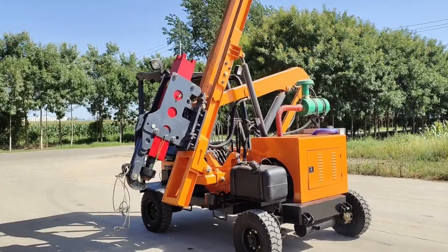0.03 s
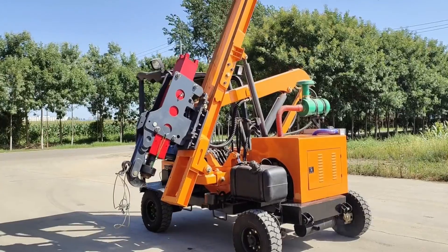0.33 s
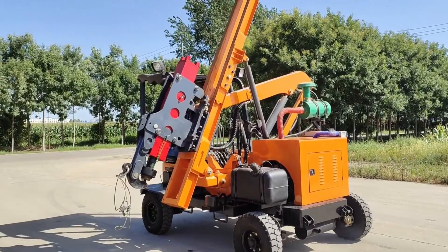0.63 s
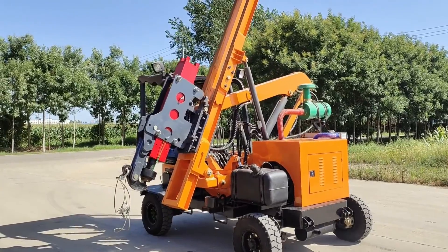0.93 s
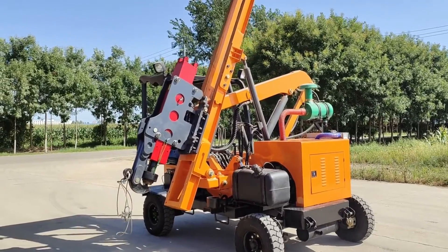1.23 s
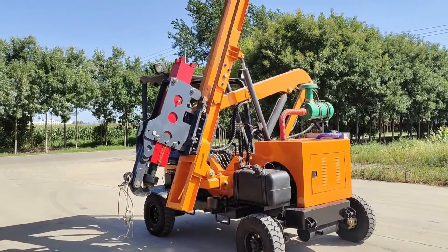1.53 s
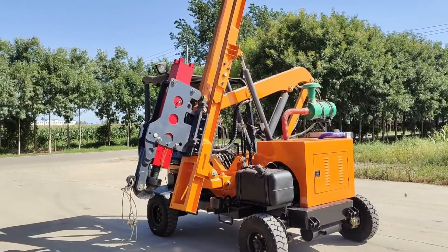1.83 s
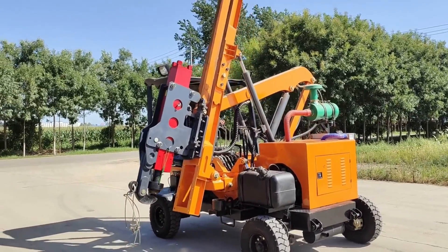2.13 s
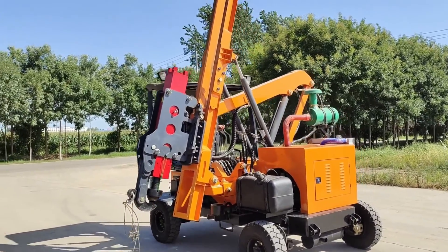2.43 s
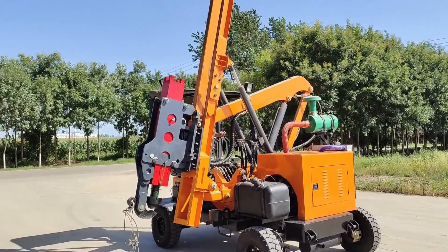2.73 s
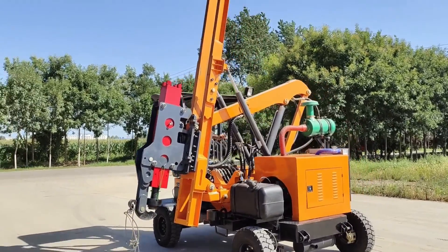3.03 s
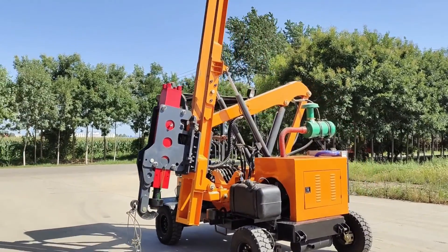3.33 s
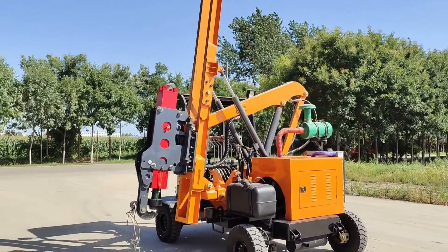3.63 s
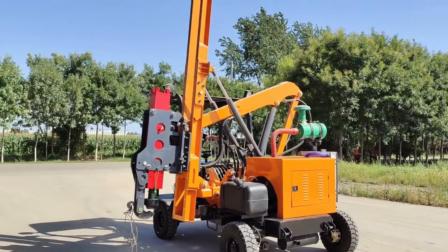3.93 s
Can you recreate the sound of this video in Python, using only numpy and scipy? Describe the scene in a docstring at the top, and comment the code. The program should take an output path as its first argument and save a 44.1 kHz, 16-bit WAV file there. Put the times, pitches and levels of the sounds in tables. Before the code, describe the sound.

A diesel engine idles on a wheeled pile driver in an open yard, knocking and rattling steadily. Loose steel scrapes a few times, then lands with one sharp clank. Low wind gusts and dull bumps hit the microphone.

```python
"""A four-cylinder diesel idles on a wheeled pile driver in an open yard.
Each firing thumps the exhaust and rattles the casing; two cylinders knock the block hard.
Loose steel scrapes a few times, then slides and lands with one sharp, ringing clank.
Fan and gears whirr underneath with a faint whine; low gusts and bumps hit the microphone."""
import sys
import numpy as np
from scipy import signal
from scipy.fft import rfft, irfft
from scipy.io import wavfile
from scipy.ndimage import uniform_filter1d

SR = 44100
rng = np.random.default_rng(int(sys.argv[2]) if len(sys.argv) > 2 else 0)


def to_wav(sig):
    """Store sig (one row per channel, or 1-D mono) as 16-bit WAV at the path in sys.argv[1].

    Samples outside -1..1 are clipped; the rate is SR.
    """
    pcm = np.clip(np.atleast_2d(sig), -1, 1) * 32767
    pcm = np.round(pcm).astype(np.int16)
    wavfile.write(sys.argv[1], SR, pcm.T)  # frames by channels


N = 176400
T = np.arange(N) / SR
FREQ = np.maximum(np.arange(N // 2 + 1) * SR / N, 1)
LEFT_ONLY = np.array([[1], [0]])
FIRING_HZ, FIRST_FIRING_S, CLATTER_SCATTER_DB = 39.49, -.003, 1.3
FIRING_INDEX = np.arange(int(N / SR * FIRING_HZ) + 1)

# Cylinder accents in firing order: block_db, clatter_db, exhaust_db
CYLINDERS = [(-2, -.5, 0), (-4, .5, -4), (0, .5, 1), (-4, -.5, -1.5)]
# Engine pan by band: freq_hz, left_minus_right_db
ENGINE_PAN = [(60, 1.5), (200, -2), (700, 0), (1290, 2), (2380, 3), (4000, -2), (5300, 4), (6300, -5),
              (7600, -5), (8500, -1), (15000, -0.5)]
def engine():
    """The diesel: thump, knock and clatter on the firing beat, over a bed of whirr and murmur."""
    block_db, clatter_db, exhaust_db = np.array(CYLINDERS, float).T
    thump = exhaust(exhaust_db)
    knock = block_shudder(block_db) + hard_knocks() + injector_ticks() + panel_knocks()
    rattle = bursts(firings(clatter_db, CLATTER_SCATTER_DB, lead_s=.0048), decay_s=.004)
    mix = thump + knock + casing_clatter(rattle) + whirr(rattle) + frame_murmur()
    return irfft(rfft(mix) * pan(across(ENGINE_PAN)))

def firings(accents_db, scatter_db, lead_s):
    """One impulse a firing, accented by cylinder, a little loose in time and level."""
    jitter, scatter = rng.standard_normal((len(FIRING_INDEX), 2)).T
    at = ((FIRST_FIRING_S - lead_s + FIRING_INDEX / FIRING_HZ + .0006 * jitter) * SR).astype(int)
    inside = (at >= 0) & (at < N)
    gains = undb(accents_db[FIRING_INDEX % len(accents_db)] + scatter_db * scatter)
    pulses = np.zeros(N)
    pulses[at[inside]] = gains[inside]
    return pulses

# Bass-heavy pipe tone: freq_hz, gain_db
PIPE_EQ = [(20, -47), (40, -2), (80, 3), (120, -2), (200, -20), (400, -36), (900, -55.5)]
# Exhaust fader: time_s, level_db
EXHAUST_LEVEL = [(0, -60), (.7, -37), (1.25, -32), (1.38, -42.5), (1.55, -32.5), (1.8, -32.5), (2.08, -36),
                 (2.15, -36), (2.35, -40), (2.6, -34), (2.85, -39), (3.1, -37), (3.6, -42), (4, -38)]
def exhaust(accents_db):
    """Each firing sends a pulse down the pipe, which rounds it into a thump."""
    pulses = firings(accents_db, scatter_db=1.5, lead_s=.00805)
    return unit(colour(pulses, PIPE_EQ)) * curve(EXHAUST_LEVEL)

# Block resonances: pitch_hz, width_hz, gain_db
BLOCK_RESONANCES = [(527, 160, -12.5), (577, 30, -6.5), (671, 35, -2.5), (734, 20, -9), (834, 17, -3.5)]
# Shudder fader: time_s, level_db
SHUDDER_LEVEL = [(0, -39), (1, -41.5), (2.5, -42.5), (3, -46), (4, -46)]
def block_shudder(accents_db):
    """The block hums with noise that surges at every firing."""
    surges = bursts(firings(accents_db, scatter_db=1.2, lead_s=.004), decay_s=.0056)
    ringing = resonate(noise() * (surges + .7), BLOCK_RESONANCES)
    return unit(resonate(ringing, [(715, 620, 0)])) * curve(SHUDDER_LEVEL)

# Block modes under a hard blow: pitch_hz, gain_db
KNOCK_MODES = [(592, -7), (686, 1), (750, -11), (836, -10)]
# Knock faders: time_s, first_cylinder_db, third_cylinder_db
KNOCK_LEVEL = [(0, -31, -34), (.6, -35, -30), (1.1, -32, -28), (1.8, -31, -29), (2.3, -30, -27.5),
               (2.7, -28.5, -30), (2.95, -33, -31), (3.2, -40, -30), (3.5, -43, -26), (4, -43, -26.5)]
def hard_knocks():
    """Two cylinders take turns, one blow each per engine cycle; the first eases off near the end."""
    fader_s, *faders_db = np.array(KNOCK_LEVEL).T
    out = 0
    for start_s, fader_db in zip((-.009, .0472), faders_db):
        times = np.arange(start_s, N / SR, len(CYLINDERS) / FIRING_HZ)
        levels_db = np.interp(times, fader_s, fader_db) + .7 * rng.standard_normal(len(times))
        out = out + struck(times, levels_db, KNOCK_MODES, swell_s=.006)
    return out

# Tone of casing and valve gear: freq_hz, gain_db
CASING_EQ = [(400, -19), (700, -26), (930, -14), (1070, -2), (1160, -0.5), (1400, 6), (1530, 0),
             (1880, 10.5), (2150, -0.5), (2550, 6.5), (2800, -2.5), (3100, 1), (3850, -14.5), (4620, -4.5),
             (5600, -14.5), (6400, -8.5), (7600, -12), (8300, -23), (9500, -14.5), (11000, -31),
             (15000, -26)]
# Fader for clatter and injector ticks: time_s, level_db
CLATTER_LEVEL = [(0, -39), (1, -37.5), (1.45, -41.5), (1.9, -38), (2.3, -34.5), (2.75, -35), (2.95, -41),
                 (3.4, -42.5), (4, -40.5)]
def casing_clatter(rattle):
    """Casing and valve gear give a bright burst of noise at each firing."""
    return unit(colour(noise() * rattle, CASING_EQ)) * curve(CLATTER_LEVEL)

def injector_ticks(swell_s=.0033, trim_db=-5):
    """The injectors ring the casing panel at every firing, riding the clatter's fader."""
    times = FIRST_FIRING_S + FIRING_INDEX / FIRING_HZ - swell_s
    levels_db = np.interp(times, *np.array(CLATTER_LEVEL).T) + trim_db
    levels_db += CLATTER_SCATTER_DB * rng.standard_normal(len(times))
    return struck(times, levels_db, PANEL_MODES, swell_s)

# Panel modes, shared with the ticks: pitch_hz, gain_db
PANEL_MODES = [(1400, -12), (1730, -1.5), (1860, -1.5), (2320, -6), (2550, -4.5), (3100, -5), (3540, -11),
               (4620, -10), (7450, -15)]
# Panel hits: start_s, level_db
PANEL_HITS = [(.554, -29.5), (.653, -29.5), (1.128, -31), (1.254, -31), (1.54, -27), (2.120, -31),
              (2.779, -31), (3.286, -31.5), (3.592, -30.5), (3.769, -28.5)]
def panel_knocks():
    """Now and then the engine makes a loose panel knock."""
    times, levels_db = np.array(PANEL_HITS).T
    return struck(times, levels_db, PANEL_MODES, swell_s=.0035)

# Modes of the landing steel: pitch_hz, gain_db, t60_s
CLANK_MODES = [(248, -19, 0.058), (298, -17.5, 0.064), (474, -23.5, 0.2), (768, -2, 0.064),
               (755, -23, 0.16), (1130, -21, 0.02), (1435, -23, 0.071), (2580, -19, 0.071),
               (2940, -15, 0.046), (3560, -20, 0.043), (4830, -24, 0.11), (5300, -33, 0.056),
               (6160, -28, 0.07)]
def clank(start_s=.8525, contact_s=.0062, trim_db=-2.5):
    """The steel lands: its ring builds during contact, then dies fast, one mid mode on top."""
    age = np.maximum(T - start_s, 0)
    attack = np.sin(np.clip(age / contact_s, 0, 1) * np.pi / 2)
    release_s = np.maximum(age - contact_s, 0)
    ring = sum(undb(db - 60 * release_s / t60) * np.sin(2 * np.pi * hz * age)
               for hz, db, t60 in CLANK_MODES)
    return undb(trim_db) * attack * ring

# Scrape cues: start_s, length_s, level_db, pan_left_db, ring_hz, ring_db
SCRAPES = [(-.01, 0.03, -21, 1, 5500, -42), (.005, 0.046, -34, 2, 4370, -4),
           (0.133, 0.028, -33, 1, 4430, -2), (0.158, 0.03, -21.5, 1.5, 7460, -9),
           (0.17, 0.063, -28.5, 1.5, 3730, -3.5), (0.337, 0.024, -21.5, 1, 4530, -19),
           (0.365, 0.032, -23, 0, 7400, -8), (0.39, 0.034, -23.5, 2.5, 1880, -3),
           (0.424, 0.019, -20, 2, 4600, 0), (0.8379, 0.026, -12, 0.5, 6140, -2.5),
           (2.974, 0.007, -30.5, -4, 4750, 2)]
# Friction tone: freq_hz, gain_db
SCRAPE_EQ = [(150, -18), (480, -4.5), (760, 6), (1050, -5.5), (2000, -2.5), (3300, -4), (4000, -6.5),
             (4600, 6.5), (6200, -6), (7900, -3.5), (10300, -15), (12200, -12.5), (15000, -19)]
# Loose steel resonances: pitch_hz, width_hz, gain_db
STEEL_RESONANCES = [(1870, 77, -0.5), (3540, 94, 6), (4560, 33, 9.5), (4642, 240, 7.5), (5500, 74, 4),
                    (6150, 160, 2), (7420, 75, -1.5)]
def scrapes(grit_db=2.3, grain_samples=20, ring_width_hz=140):
    """Steel slides on steel: gritty friction swells and fades, each scrape with its own ring."""
    grains = undb(grit_db * rng.standard_normal(N // grain_samples + 1))
    friction = noise() * np.repeat(grains, grain_samples)[:N]
    rasp = unit(colour(friction, SCRAPE_EQ))
    body = unit(rasp + undb(-2) * unit(resonate(friction, STEEL_RESONANCES)))
    out = 0
    for start, length, level_db, pan_db, ring_hz, ring_db in SCRAPES:
        swell = np.interp(T, [start, start + .42 * length, start + length], [0, 1, 0])
        ring = unit(resonate(friction, [(ring_hz, ring_width_hz, 0)])) * undb(ring_db)
        out = out + (body + ring) * swell * undb(level_db) * pan(pan_db)
    return out

# Fan and gear tone: freq_hz, gain_db
WHIRR_EQ = [(90, -28), (150, -6.5), (205, -16), (360, -20.5), (560, -5.5), (690, -5), (850, -10.5),
            (935, -18), (1080, -9), (1180, -16), (1400, -10), (1520, -14), (1830, -9), (2100, -13.5),
            (2550, -11.5), (2900, -14), (3900, -19), (4650, -18), (5400, -23.5), (6300, -21.5), (7700, -25),
            (8100, -28.5), (9600, -29), (10600, -40), (12000, -32.5), (15000, -38)]
# Whirr fader: time_s, level_db
WHIRR_LEVEL = [(0, -34.5), (1, -34), (2, -32.5), (2.7, -34), (3.3, -34), (4, -33.5)]
# Narrow rings over the whirr: pitch_hz, width_hz, gain_db
WHIRR_RINGS = [(1830, 80, 3), (3539, 40, 1), (4543, 26, 8), (4805, 50, 1), (5103, 28, -2), (6160, 55, -3),
               (7480, 70, -1), (7800, 100, -1)]
def whirr(rattle, rings_db=-48.5):
    """Fan and gears lay a steady bed, topped by thin rings that pulse with the rattle."""
    bed = unit(colour(noise(), WHIRR_EQ)) * curve(WHIRR_LEVEL)
    rings = unit(resonate(noise() * (1 + .94 * rattle), WHIRR_RINGS))
    return bed + rings * undb(rings_db)

# Frame resonances: pitch_hz, width_hz, gain_db
FRAME_RESONANCES = [(223, 49, 2.5), (308, 90, -1), (372, 31, -2.5)]
# Murmur fader: time_s, level_db
FRAME_LEVEL = [(0, -43.5), (.8, -53), (.9, -38), (1.15, -47), (1.4, -77), (3.65, -50.5), (3.85, -41),
               (3.93, -46.5), (4, -71)]
def frame_murmur():
    """The frame resonates in a low murmur with brief swells."""
    ringing = resonate(noise(), FRAME_RESONANCES)
    return unit(resonate(ringing, [(280, 155, 0)])) * curve(FRAME_LEVEL)

# Whine glide: time_s, pitch_hz, level_db
WHINE_GLIDE = [(0, 2016, -42), (0.199, 1967, -43), (.42, 1953, -43), (0.599, 1873, -58), (1.2, 1851, -51),
               (4, 1878, -47)]
def whine(waver_hz=13.6):
    """One thin, wavering tone, like a hydraulic pump, sags and fades back."""
    times, hz, db = np.array(WHINE_GLIDE).T
    waver = unit(uniform_filter1d(rng.standard_normal(N), size=700))
    phase = 2 * np.pi * np.cumsum(np.interp(T, times, hz) + waver_hz * waver) / SR
    return np.sqrt(2) * np.sin(phase) * undb(np.interp(T, times, db))

# Rumble tone: freq_hz, gain_db
WIND_EQ = [(15, -11), (35, -7.5), (60, 1.5), (120, -2), (200, -11), (400, -23), (1000, -54)]
# Gust fader: time_s, level_db
GUST_LEVEL = [(0, -25.5), (.04, -26), (.11, -38.5), (.17, -27), (.33, -31.5), (.44, -19.5), (.51, -41.5),
              (.58, -33), (.65, -24.5), (.8, -31), (.91, -31.5), (.98, -27), (1.03, -34.5), (1.4, -37.5),
              (1.8, -35), (2.06, -32), (2.4, -41), (2.85, -31), (3.18, -40), (3.28, -31), (3.42, -24.5),
              (3.47, -31.5), (3.51, -30), (3.56, -40.5), (3.82, -39.5), (3.85, -35), (3.93, -35),
              (3.97, -45)]
def wind():
    """Wind buffets the microphone in short, low gusts."""
    return unit(colour(noise(), WIND_EQ)) * curve(GUST_LEVEL)

# Bump cues: centre_s, pitch_hz, level_db
BUMPS = [(0.434, 101, -11), (0.449, 70, -16), (0.636, 95, -18), (.655, 101, -20), (.711, 85, -16),
         (0.961, 90.6, -23), (0.98, 81.5, -14.5), (2.858, 110, -24), (3.287, 90, -19), (3.44, 99, -18.5),
         (3.509, 165, -24.5), (3.853, 100, -29)]
def bumps(width_s=.006):
    """Dull bumps, like a hand on the microphone, each one short, soft swing."""
    return sum(undb(db) * np.exp(-((T - at) / width_s) ** 2) * np.sin(2 * np.pi * hz * (T - at))
               for at, hz, db in BUMPS)

def yard(x, wet_db=-20, t60_s=.14, gap_s=.008):
    """Machine and concrete add weak, short reflections."""
    t = T[:SR // 2]
    tail = rng.standard_normal((2, len(t))) * undb(-60 * t / t60_s) * (t > gap_s)
    tail /= np.sqrt(np.sum(tail ** 2, axis=1, keepdims=True))
    return x + undb(wet_db) * signal.fftconvolve(x, tail, axes=1)[:, :N]

def struck(times, levels_db, modes, swell_s, detune=.02):
    """Each blow swells and dies away in the given modes, slightly retuned every time."""
    hz, db = np.array(modes).T[:, :, None]
    t = T[:SR // 12]
    envelope = (t / swell_s) ** 2 * np.exp(2 * (1 - t / swell_s))
    out = np.zeros(N + len(t))
    for start_s, level_db in zip(times, levels_db):
        pitch_hz = hz * (1 + detune * rng.standard_normal(hz.shape))
        phase = 2 * np.pi * (pitch_hz * t + rng.random(hz.shape))
        at = int(start_s * SR)
        if 0 <= at < N:
            out[at:at + len(t)] += envelope * np.sum(undb(db + level_db) * np.sin(phase), axis=0)
    return out[:N]

def bursts(pulses, decay_s, rise_s=.004):
    """An envelope with a quick rise and decay at each impulse."""
    t = T[:SR // 10]
    shape = (1 - np.exp(-t / rise_s)) ** 2 * np.exp(-t / decay_s)
    return unit(signal.fftconvolve(pulses, shape)[:N])

# Left-right likeness of the noise: freq_hz, correlation
LIKENESS = [(60, .87), (200, 0.6), (700, .97), (1200, 0.71), (2500, 0.54), (6000, 0.68), (14000, 0.66)]
def noise():
    """Stereo noise whose width varies by band."""
    alike = across(LIKENESS)
    mid, side = rfft(rng.standard_normal((2, N)))
    return unit(irfft(mid * np.sqrt(1 + alike) + side * np.sqrt(1 - alike) * np.array([[1], [-1]])))

def colour(x, eq):
    """Minimum-phase EQ from freq_hz, gain_db rows."""
    cepstrum = irfft(np.log(undb(across(eq))))
    cepstrum[1:N // 2] *= 2
    cepstrum[N // 2 + 1:] = 0
    return irfft(rfft(x) * np.exp(rfft(cepstrum)))

def resonate(x, rows):
    """Parallel resonators of alternating polarity from pitch_hz, width_hz, gain_db rows."""
    response = sum((-1) ** k * undb(db) / (1 + 1j * (FREQ ** 2 - hz ** 2) / (FREQ * width))
                   for k, (hz, width, db) in enumerate(rows))
    return irfft(rfft(x) * response)

def curve(rows):
    """Fader gain from time_s, level_db rows."""
    return undb(np.interp(T, *np.array(rows).T))

def across(rows):
    """Join freq_hz, value rows on a log-frequency axis."""
    hz, values = np.array(rows).T
    return np.interp(np.log(FREQ), np.log(hz), values)

def pan(db):
    """Stereo gains with the left louder by db."""
    return undb(np.array([[1], [-1]]) * db / 2)

def delay_left(x, delay_s):
    """The sound reaches the left channel late."""
    return irfft(rfft(x) * np.exp(-2j * np.pi * FREQ * delay_s * LEFT_ONLY))

def undb(db):
    """Decibels to gain."""
    return 10 ** (np.asarray(db) / 20)

def unit(x):
    """Scale to rms 1."""
    return x / np.sqrt(np.mean(x ** 2) + 1e-18)

# Stereo phase of the machine: freq_hz, left_lead_rad
STEREO_PHASE = [(100, -0.14), (700, -0.19), (1460, 0.64), (1720, 0.74), (2240, 0.043), (2760, -2.33),
                (4220, -1.98), (4820, -1.3), (5680, -1.7), (7670, -1.23), (10000, -1.5), (15000, -1.9)]
def scene():
    """The machine reaches the two channels out of step; wind and bumps act on the microphone itself."""
    machine = engine() + whine() + yard(scrapes() + delay_left(clank(), delay_s=.0001))
    placed = irfft(rfft(machine) * np.exp(1j * across(STEREO_PHASE) * LEFT_ONLY))
    return placed + wind() + bumps()

def record(dry, cutoff_hz=15300):
    """A steep low-pass takes off the very top."""
    return signal.sosfilt(signal.ellip(10, .2, 90, cutoff_hz, fs=SR, output="sos"), dry)

dry = scene()
out = record(dry)
to_wav(out)
```